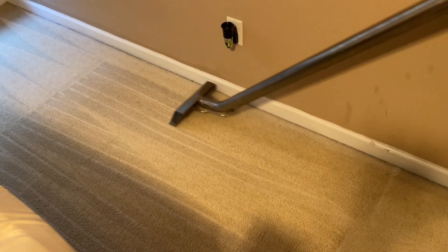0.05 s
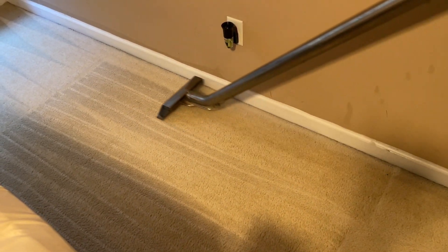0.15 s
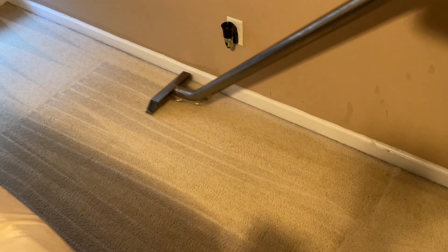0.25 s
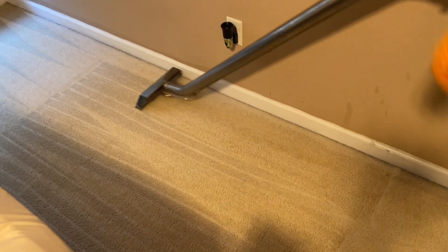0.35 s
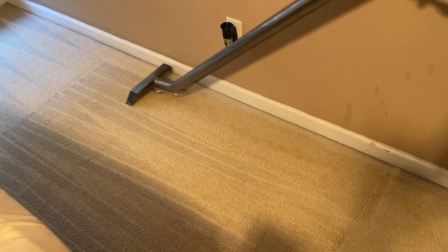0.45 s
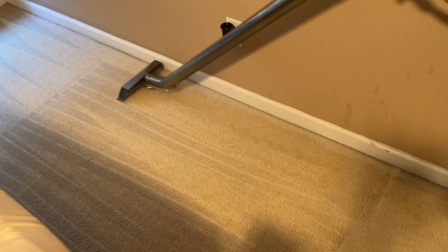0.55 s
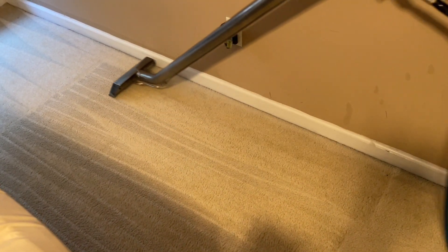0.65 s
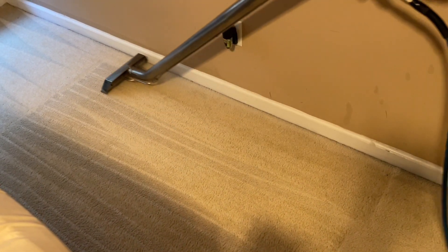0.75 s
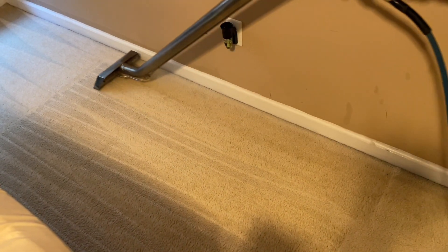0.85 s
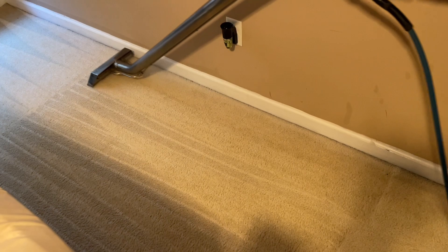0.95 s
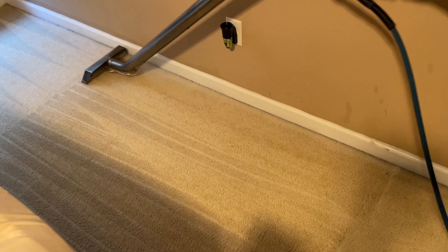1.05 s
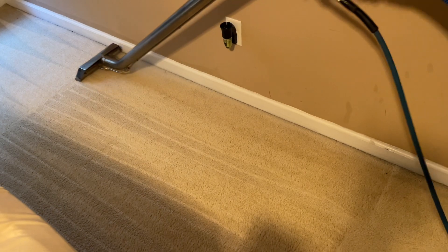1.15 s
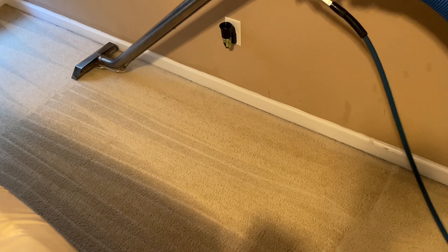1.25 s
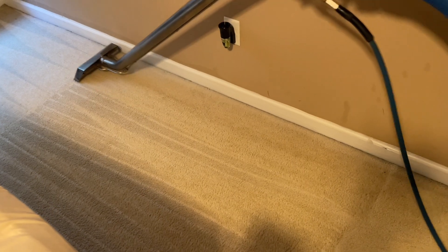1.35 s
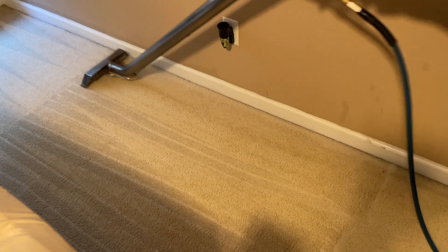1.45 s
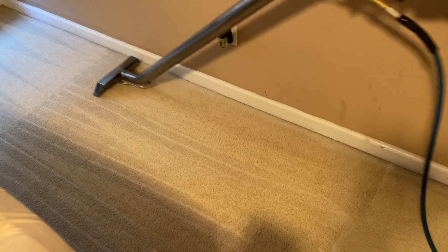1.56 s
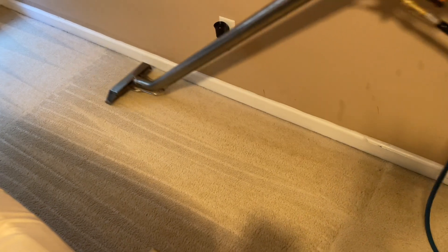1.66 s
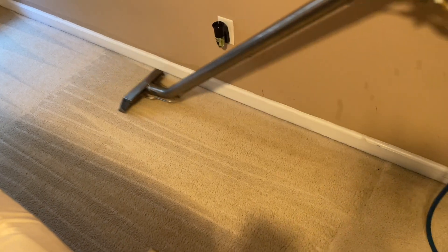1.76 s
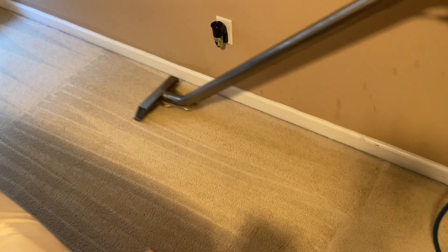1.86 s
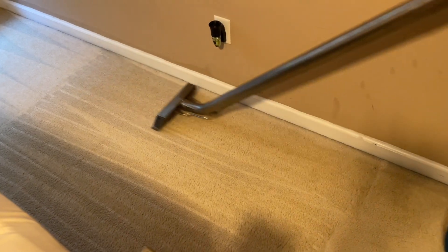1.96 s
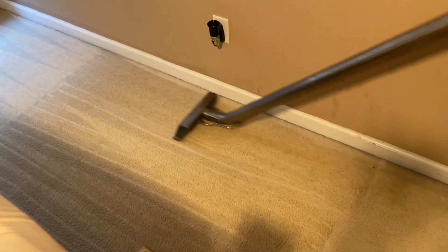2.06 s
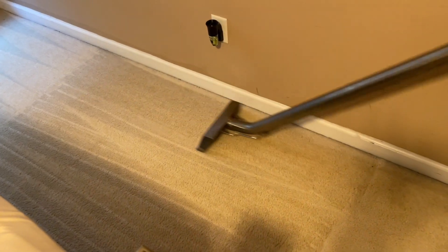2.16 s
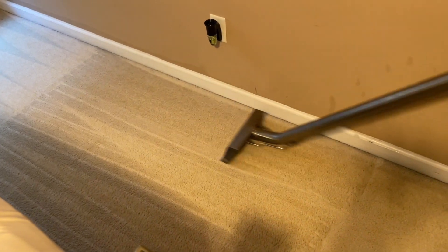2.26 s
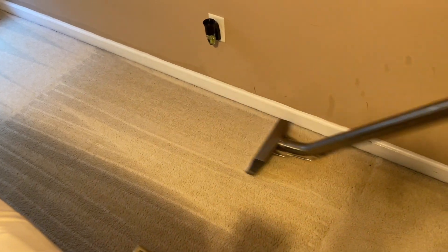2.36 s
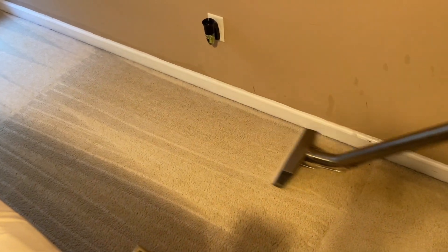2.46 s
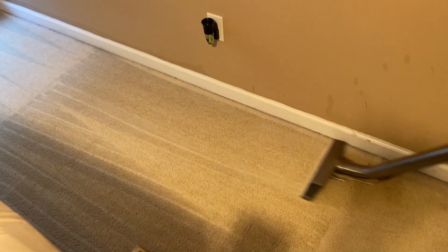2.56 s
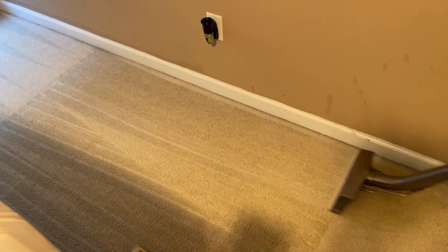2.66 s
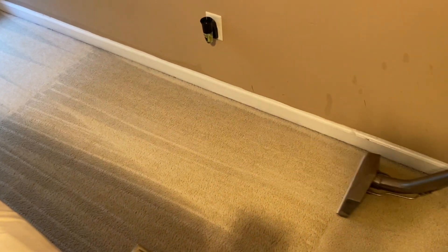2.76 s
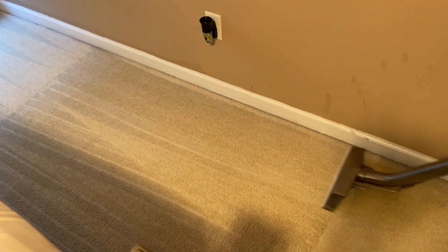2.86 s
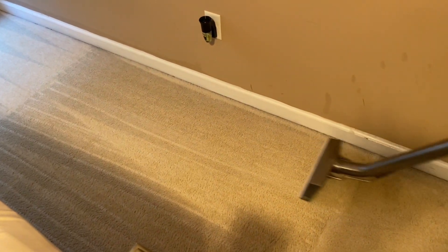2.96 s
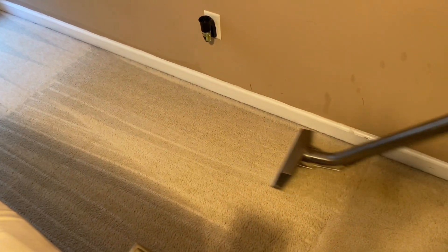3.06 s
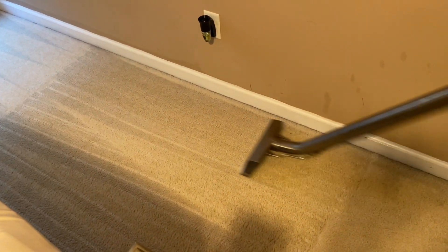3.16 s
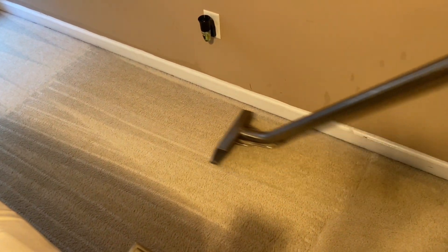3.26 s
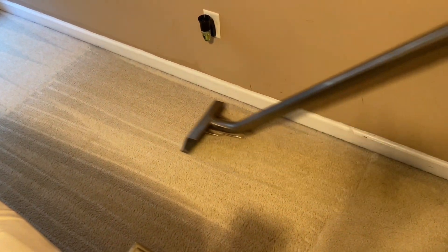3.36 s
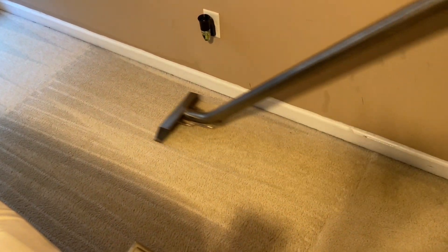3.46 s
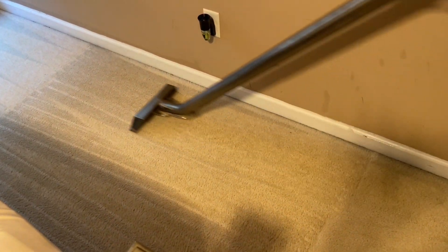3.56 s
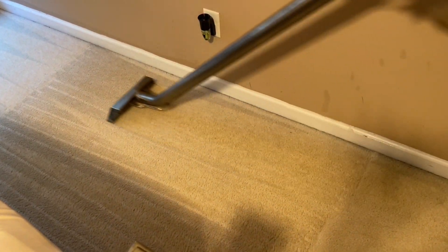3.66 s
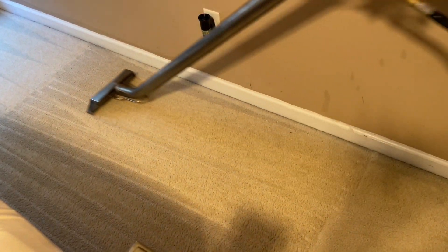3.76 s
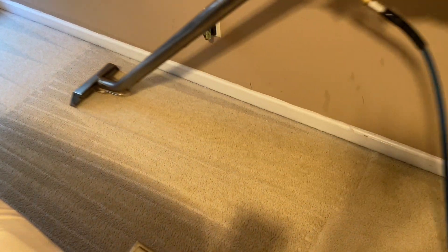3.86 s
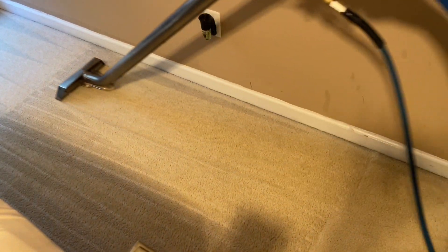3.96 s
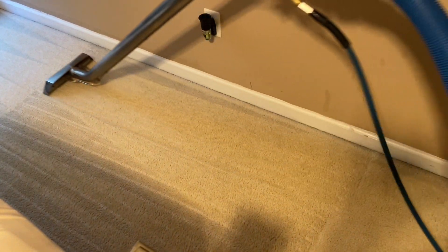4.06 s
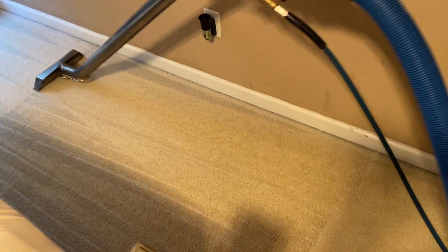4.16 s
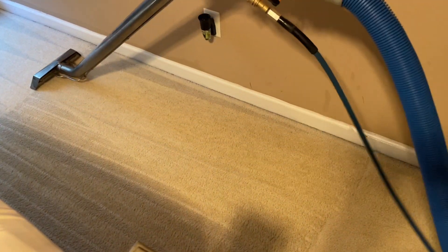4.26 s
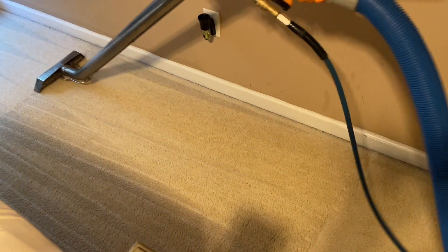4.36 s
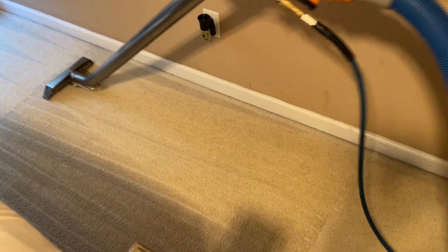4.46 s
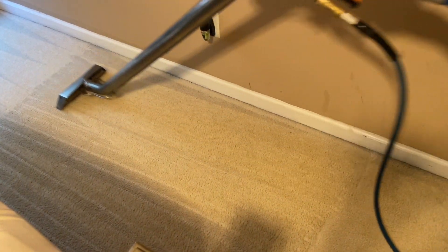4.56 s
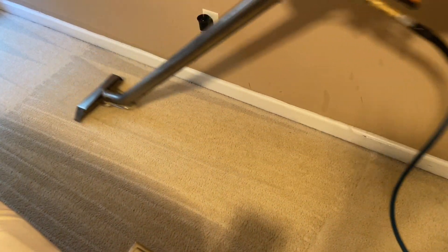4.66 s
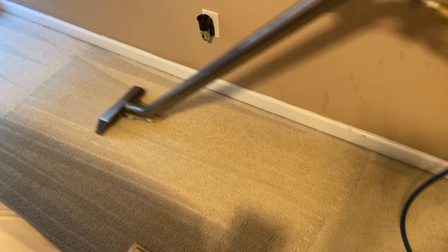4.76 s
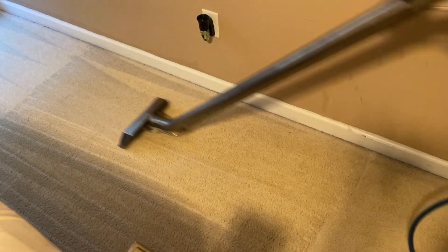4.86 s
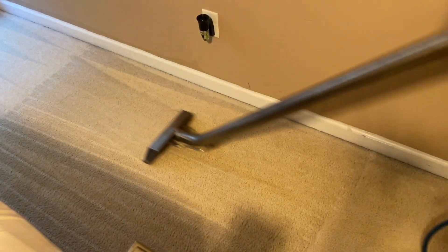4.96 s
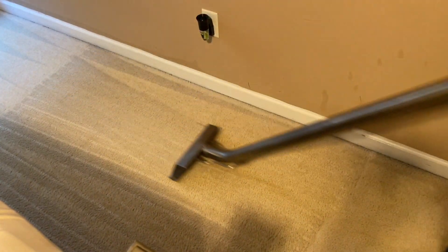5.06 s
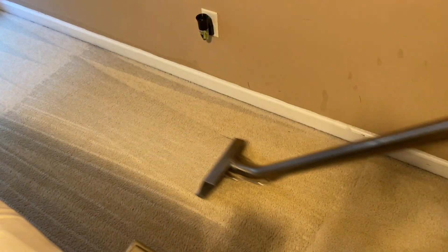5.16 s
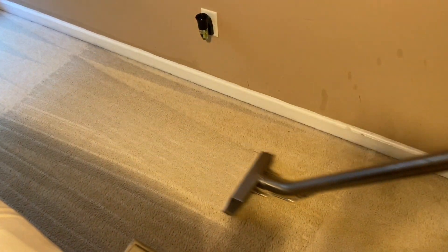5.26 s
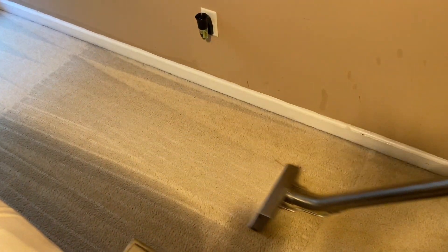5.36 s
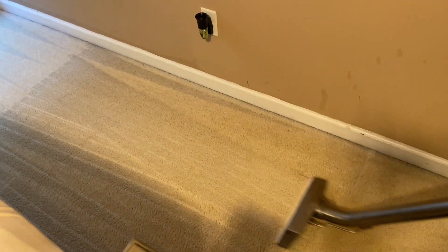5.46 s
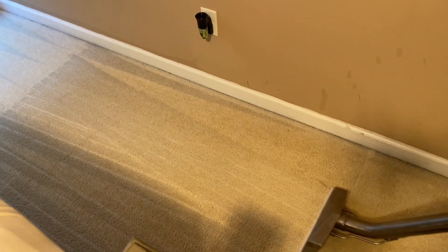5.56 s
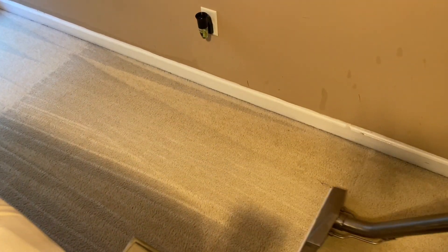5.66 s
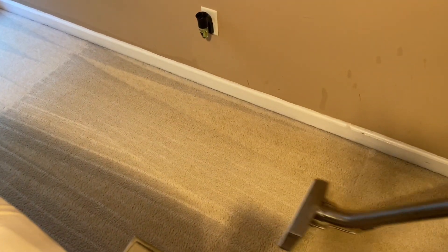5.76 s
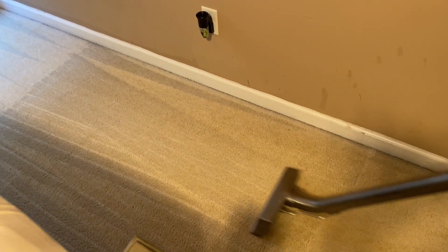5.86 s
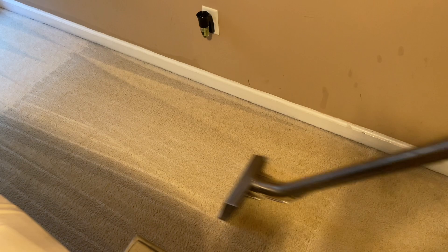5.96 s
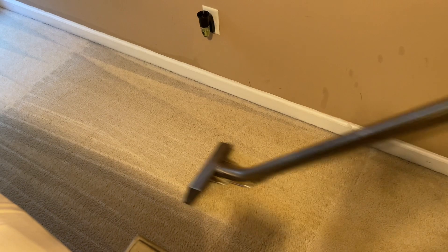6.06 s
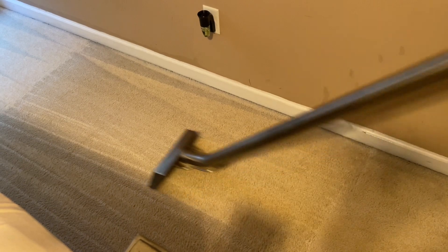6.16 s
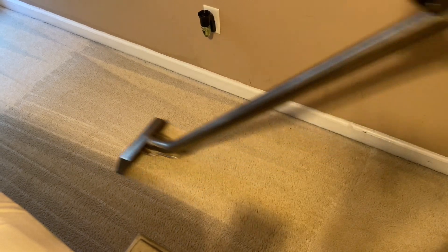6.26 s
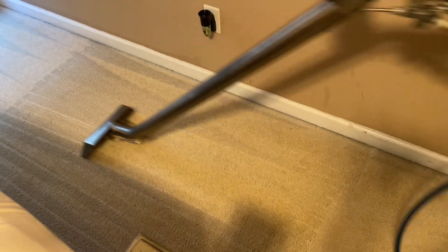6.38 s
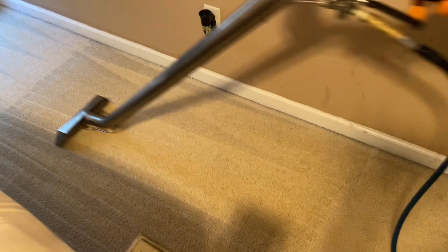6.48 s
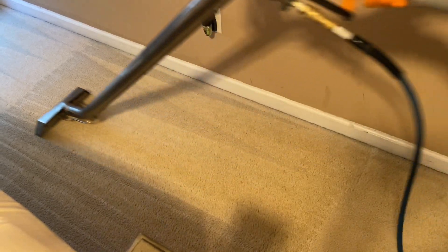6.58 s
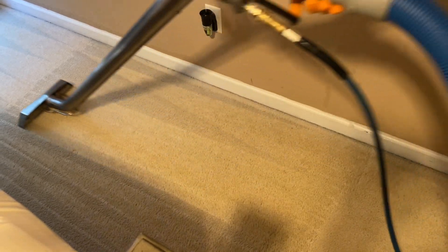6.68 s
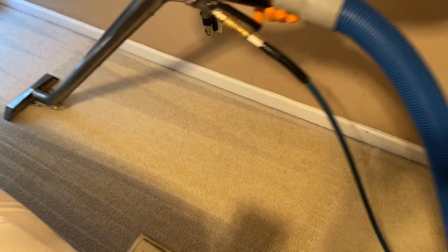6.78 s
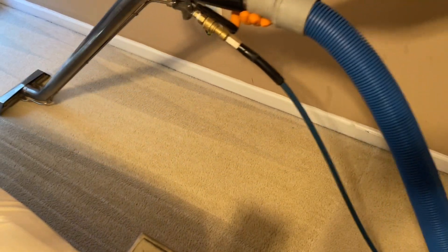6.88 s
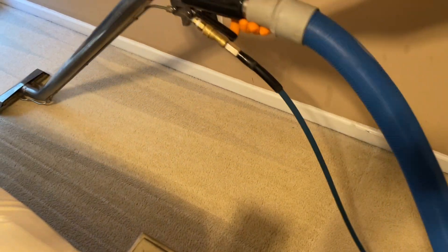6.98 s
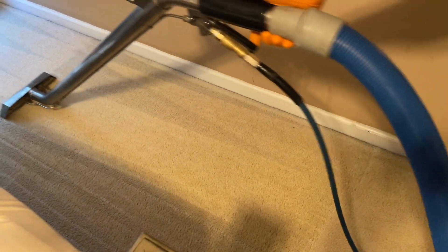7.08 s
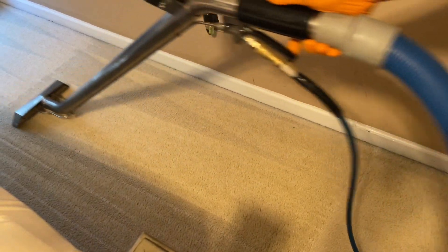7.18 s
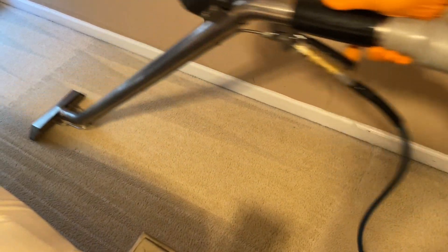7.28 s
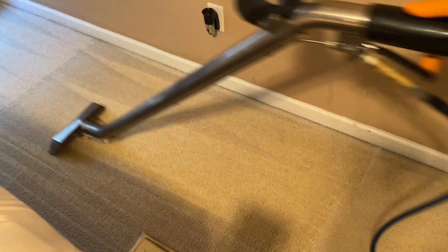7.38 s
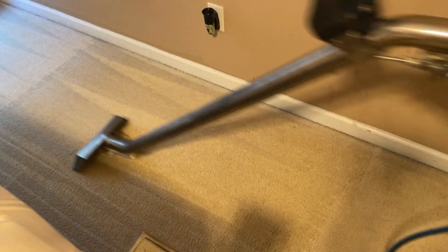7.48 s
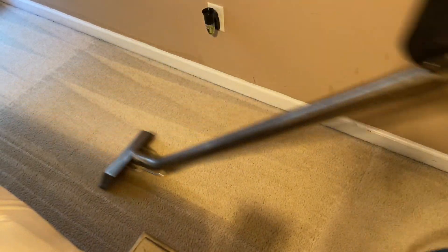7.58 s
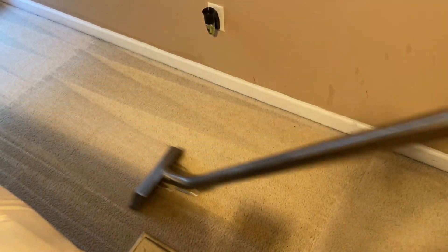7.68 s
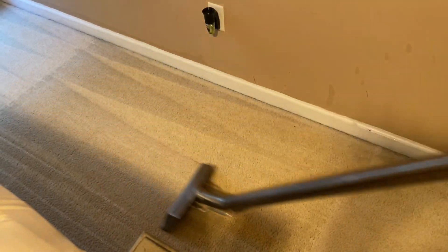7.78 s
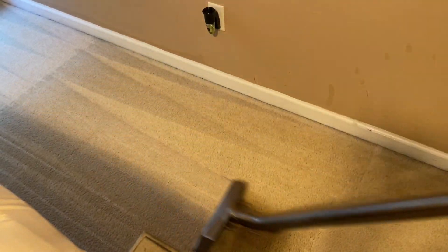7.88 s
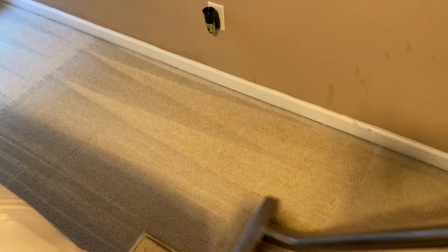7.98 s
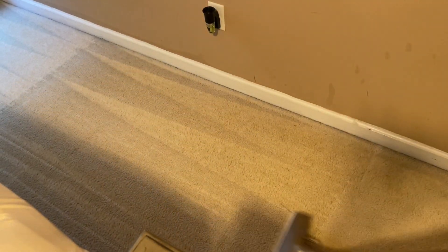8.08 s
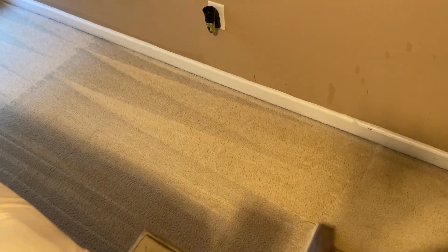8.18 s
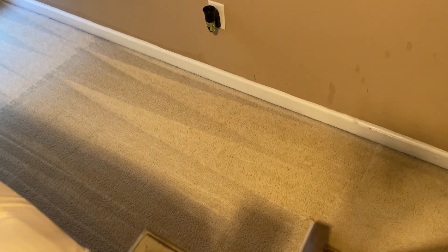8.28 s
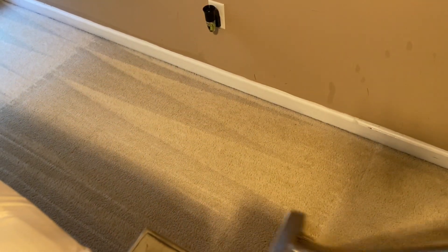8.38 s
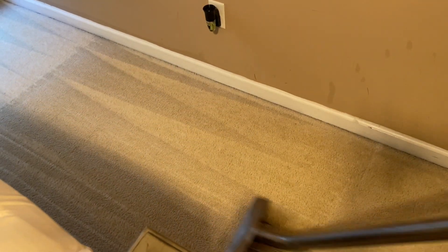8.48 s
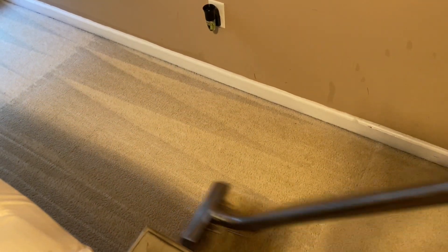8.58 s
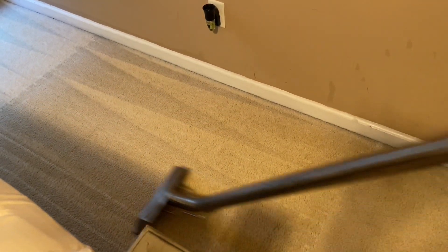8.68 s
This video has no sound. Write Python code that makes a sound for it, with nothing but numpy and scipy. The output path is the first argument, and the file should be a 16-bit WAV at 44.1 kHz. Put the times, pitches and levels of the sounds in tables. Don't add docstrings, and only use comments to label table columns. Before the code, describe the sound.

Steady airy suction and thin high hiss surround the rasping strokes of a carpet cleaning head, heard close indoors. The spray stops early with a sharp snap; the next pull is the strongest, gritty and juddering. Later strokes alternate softer and rougher, dipping briefly at each turn, with scattered dry flicks, dull floor knocks and a hose leak swelling as it swings near.

```python
import sys
import numpy as np
from scipy import signal
from scipy.fft import rfft, irfft, next_fast_len
from scipy.io import wavfile
from scipy.ndimage import uniform_filter1d, map_coordinates

SR = 44100
rng = np.random.default_rng(int(sys.argv[2]) if len(sys.argv) > 2 else 0)


def gain_from_decibels(decibels):
    exponent = np.asarray(decibels, float) / 20
    return 10 ** exponent


def persist_wave(psi):
    counts = np.round(np.clip(psi, -1, 1) * 32767).astype(np.int16)
    wavfile.write(sys.argv[1], SR, np.atleast_2d(counts).T)


N = 384993

# start_s, stop_s, drag_at_start_db, drag_at_stop_db, weight_on_floor_db
STROKES = [
    (-.3, 1.18, -35.5, -43, -60),
    (1.298, 2.745, -29, -24, -54.5),
    (2.83, 4.57, -31.5, -43, -43),
    (4.35, 5.67, -30.5, -30.5, -50),
    (5.7, 6.98, -35.5, -39.5, -39.5),
    (7.01, 8.28, -35.5, -28, -47),
    (8.33, 9.36, -35.5, -34.5, -39),
]
# time_s, leak_db
HOSE_SWING = [(0, -47.5), (1.1, -51), (1.3, -53.5), (2.2, -53.5), (2.5, -61.5), (3.3, -59), (3.6, -53.5),
              (4.1, -52.5), (4.65, -57), (4.9, -54), (5.5, -61), (6.1, -59), (6.45, -61), (6.62, -51),
              (7.1, -53), (7.7, -51), (8.1, -58.5), (8.73, -61)]
# time_s, seal_db
SLOT_SEAL = [(0, -1), (1.1, -1), (1.6, 1), (2.35, 3), (2.75, 0), (3.2, 1), (3.5, -2), (4.1, 1.5),
             (4.6, 0.5), (5.0, 0), (5.5, 3), (6.0, 0), (6.5, 2.5), (7.0, 3.5), (7.4, 3.5), (7.8, -1),
             (8.1, 4), (8.35, 0.5)]


def unit(x):
    return x / np.sqrt(np.mean(x ** 2) + 1e-20)


def along(points, hz):
    f, v = np.transpose(points)
    return np.interp(np.log(hz + 1), np.log(f + 1), v)


def curves(rows):
    s, *cols = np.transpose(rows)
    return [np.interp(np.arange(N) / SR, s, c) for c in cols]


def swells(rows):
    t = np.arange(N) / SR
    return sum(db * np.exp(-((t - s) / half) ** 2) for s, db, half in rows)


def wobble(rate):
    return map_coordinates(rng.standard_normal(N // 100), [np.arange(N) * rate / SR])


def filtered(x, response):
    m = next_fast_len(N + SR // 4)
    return irfft(rfft(x, m) * response(np.fft.rfftfreq(m, 1 / SR)), m)[..., :N]


def patches(shape, bands, frames):
    field = uniform_filter1d(rng.standard_normal(shape), size=bands, axis=0)
    return unit(uniform_filter1d(field, size=frames, axis=1))


def rush(colour, patchy_db=0, gate=1):
    pair = rng.standard_normal((2, N))
    if patchy_db:
        z = signal.stft(pair, nperseg=512)[2]
        gain = gain_from_decibels(patchy_db * patches(z.shape[1:], bands=6, frames=10))
        pair = signal.istft(z * gain, nperseg=512)[1][:, :N]
    return unit(filtered(gate * pair, lambda hz: gain_from_decibels(along(colour, hz))))


def reach():
    # time_s, distance_m
    distance = [(0, 1.8), (1.2, 2.06), (1.6, 2), (2.8, 1.13), (4.25, 2.44), (4.6, 1.9), (5.7, 1.54),
                (7.0, 2.9), (7.3, 1.8), (8.25, 0.71), (8.73, 1.85)]
    return curves(distance)[0] - 1.8


def jet(fall_s=0.0089):
    valve_s = 1.163
    return np.exp(-np.maximum(np.arange(N) / SR - valve_s, 0) / fall_s)


def moving(attack_s, release_s):
    t = np.arange(N) / SR
    start, stop = np.transpose(STROKES)[:2, :, None]
    rise = 1 - np.exp(-np.maximum(t - start, 0) / attack_s)
    fall = 1 - np.exp(-np.maximum(stop - t, 0) / release_s)
    return (rise * fall) ** 1.3


def stroke_gain(levels_db, pull_db, rest_db, attack_s, release_s):
    pulls = np.arange(len(STROKES))[:, None] % 2
    moves = gain_from_decibels(levels_db + pull_db * pulls) * moving(attack_s, release_s)
    return np.hypot(moves.sum(axis=0), gain_from_decibels(rest_db))


def jerks():
    breaks = [
        1.316,
        4.364,
        7.026,
        8.352,
    ]
    hushes = [0, -5.5, -4.5, 2]
    t = np.arange(N) / SR
    hush_s = 0.1
    hush_db = sum(db * (t < s) * np.exp(np.minimum(t - s, 0) / hush_s) for s, db in zip(breaks, hushes))
    return gain_from_decibels(hush_db)


def boom(weight_db, tread_db, judder):
    # pitch_hz, level_db (per Hz)
    boom_colour = [(20, -46), (32, -13), (45, 1), (65, 11.5), (80, 7), (95, 3.5), (130, -52)]
    gain = stroke_gain(weight_db - 4 * reach(), pull_db=3.0, rest_db=-53.5, attack_s=0.05, release_s=0.043)
    return gain * gain_from_decibels(tread_db + 0.32 * judder) * rush(boom_colour)


def thrum(level_db, judder, flutter):
    # pitch_hz, level_db (per Hz)
    thrum_colour = [(60, -39), (85, 2), (100, 2), (135, 4.5), (160, -7.5), (220, -39.5)]
    # time_s, extra_db, half_length_s
    heaves = [(.82, -3.5, .1), (1.25, 5, .07), (1.55, -1, .1), (1.87, -2, .07), (2.32, -3.5, 0.08),
              (3.62, 5, .06), (2.92, -5, 0.078), (3.2, -3, .12), (3.95, -3, .07), (4.5, 0, 0.064),
              (4.85, -7, 0.11), (2.6, 1.5, 0.13), (5.3, 1, .08), (5.77, -4, .07), (6.05, -1, .07),
              (6.52, 2.5, .08), (6.85, 3.5, .12), (7.45, 3, .12), (8.6, 2, .1)]
    gain = stroke_gain(level_db + swells(heaves), pull_db=-0.5, rest_db=-50.0, attack_s=0.069, release_s=0.12)
    return gain * gain_from_decibels(0.5 * judder) * rush(thrum_colour, gate=gain_from_decibels(flutter))


def roar(level_db, judder, flutter):
    # pitch_hz, level_db (per Hz)
    roar_colour = [(120, -19), (160, -6.5), (200, 0), (320, -2), (480, -6), (620, -14), (900, -27.5),
                   (2000, -51)]
    gain = stroke_gain(level_db, pull_db=0, rest_db=-43.5, attack_s=0.048, release_s=0.055)
    return gain * gain_from_decibels(0.36 * judder) * rush(roar_colour, gate=gain_from_decibels(0.84 * flutter))


def fibre_snaps():
    # pitch_hz, level_db (per Hz)
    fibre_colour = [(500, -16), (900, -12), (1400, 6), (2600, -5), (4500, -17), (9000, -28)]
    rate = 700
    size = gain_from_decibels(6.5 * np.minimum(rng.exponential(size=N), 2))
    clicks = (rng.random((2, N)) < rate / SR) * size * np.sign(rng.standard_normal(N))
    return unit(filtered(clicks, lambda hz: gain_from_decibels(along(fibre_colour, hz))))


def rasp(level_db, done, judder, flutter):
    # pitch_hz, level_db (per Hz)
    rasp_colour = [(400, -3.5), (650, -0.5), (850, 1), (1200, -2), (1600, -2.5), (2200, -17.5),
                   (3000, -18.5), (6000, -28)]
    # at_start_db, at_stop_db
    lip_bite = [(5, 9.5), (-1, -3), (-0.3, 1.5), (-1, 1), (3.5, -2), (1, 0.5), (-3.5, 5)]
    # time_s, extra_db, half_length_s
    scrapes = [(.5, -1.5, 0.16), (1.2, -3, 0.072), (2.93, -0.5, .07), (8.05, 1, .1), (1.35, 9, 0.097),
               (1.6, -2.5, 0.16), (2.25, 1, .2), (3.35, 2.5, 0.077), (3.6, -3, 0.083), (3.0, 1, .15),
               (3.95, -2, 0.12), (4.2, 3.5, .08), (5.25, -1.5, 0.15), (5.67, -3, .04), (5.78, 2, .05),
               (5.9, -0.5, .1), (2.82, -3, .03), (4.9, 1.5, .1), (4.6, 1.5, .1), (6.3, 3.5, 0.27),
               (6.75, 6, 0.067), (7.12, 2, 0.05), (7.6, -1, 0.15), (8.2, -4, 0.061), (8.45, 1.5, .08)]
    first_db, last_db = np.transpose(lip_bite)[:, :, None]
    wet_db = 4 * jet(fall_s=0.19)
    bite_db = first_db + (last_db - first_db) * done + wet_db + swells(scrapes)
    gain = stroke_gain(level_db + bite_db, pull_db=3.5, rest_db=-47.5, attack_s=0.05, release_s=0.03)
    scratch = rush(rasp_colour, patchy_db=-0.1, gate=gain_from_decibels(0.22 * flutter + 0.96 * wobble(300)))
    return gain * gain_from_decibels(0.81 * judder + 0.61) * (scratch + gain_from_decibels(-10) * fibre_snaps())


def drag(judder):
    # time_s, extra_db, half_length_s
    snags = [(.12, 5, 0.075), (.42, 6, 0.023), (1.2, 8, 0.082), (1.25, 10, 0.042), (1.29, -3, .03),
             (1.4, -10, 0.073), (1.5, 0, .06), (1.66, 2, 0.2), (1.82, -2, 0.11), (2.0, 3, 0.059),
             (2.41, 2.5, 0.023), (2.745, 6, 0.029), (2.78, 3, .02), (2.85, 7, .015), (2.925, -4, .012),
             (3.14, 1, 0.083), (3.38, 0.5, .08), (3.57, -5, 0.073), (3.8, 2, 0.073), (4.48, 0, 0.091),
             (4.62, 0.5, 0.036), (4.73, 5.5, 0.04), (4.97, 2, 0.044), (5.48, 1, .06), (5.62, -8, 0.039),
             (5.79, -7, 0.056), (6.3, 3, 0.26), (6.63, -3.5, 0.077), (6.73, 1, 0.046), (7.27, 1, 0.032),
             (7.45, 1, 0.034), (8.11, -0.5, 0.062), (8.23, -8, 0.042), (8.4, -8, 0.06), (8.66, 2.5, .06)]
    # time_s, lift_db, half_length_s
    tread = [(.02, 7, .08), (1.12, 11, 0.059), (1.9, 4, .06), (2.6, 6, .12), (3.14, 7, 0.085),
             (3.97, 6, 0.099), (4.15, 6, 0.087), (4.45, 4, 0.11), (2.64, 6, .15), (1.36, -9, .05),
             (2.6, 7, .07), (7.47, -9, .06), (4.85, -9, .1), (2.8, 7, .06), (3, 0, .1), (1.67, -9, 0.087),
             (.85, -7, .12), (3.1, 2, .08), (5.4, 4, .12), (6.55, -3, 0.062), (7.65, 3, .07),
             (5.03, -10, 0.058), (5.49, 7, .06), (5.97, 7.5, 0.24), (7.39, 3, .05), (7.93, -1, .1),
             (8.38, 9, 0.051), (8.51, 7, .06), (8.73, 9, 0.05)]
    start, stop, first_db, last_db, weight_db = np.transpose(STROKES)[:, :, None]
    done = np.clip((np.arange(N) / SR - start) / (stop - start), 0, 1)
    drag_db = first_db + (last_db - first_db) * done
    snag_db, tread_db = swells(snags), swells(tread)
    thrum_db = drag_db - 4.5 + 2.0 * snag_db + 0.19 * (weight_db + 45.0) + 0.17 * tread_db
    flutter = wobble(90)
    low = boom(weight_db, tread_db, judder) + thrum(thrum_db, judder, flutter)
    scrape = roar(drag_db + snag_db, judder, flutter)
    scrape = scrape + rasp(drag_db - 7 + 0.58 * snag_db, done, judder, flutter)
    return low + jerks() * scrape


def air(judder):
    # time_s, flow_db
    flow = [(0, -39.5), (.5, -42), (1.15, -41.5), (1.36, -34), (1.53, -41), (2.1, -38.5), (2.5, -40),
            (2.9, -46.5), (3.5, -45.5), (4.2, -52), (4.67, -48), (5.0, -44.5), (5.57, -43.5), (6.1, -47.5),
            (6.7, -53), (7.3, -49.5), (8.17, -44), (8.73, -49.5)]
    # time_s, extra_flow_db, half_length_s
    gulps = [(1.19, 0.5, 0.02), (1.24, 3, 0.01), (1.28, -1, .03), (2.74, 6, 0.088), (3.45, -1, 0.19),
             (4.56, 5, .03), (4.72, 2, 0.052), (4.44, -1, .05), (4.95, 0, 0.046), (5.7, 2, 0.029),
             (6.12, 2.5, .04), (6.23, -1.5, 0.035), (6.47, 1.5, .05), (7.06, 4.5, 0.06),
             (7.32, -1.5, 0.067), (8.35, 4, 0.018)]
    # pitch_hz, level_db (per Hz)
    suck_colour = [(900, -8), (1900, 0), (2200, -0.5), (2800, -2), (3600, -2), (4300, -5.5), (6000, -30)]
    whistle_colour = [(2500, -15), (3600, -7), (4300, -3.5), (5100, -3), (5800, -3.5), (6600, -8.5),
                      (8500, -25)]
    spray_colour = [(4500, -13.5), (6000, -1), (7200, 1), (8500, -1), (9800, -3), (10800, -8), (13000, -35)]
    mist_colour = [(8000, -13), (10000, -3), (11000, -1.5), (12500, -5), (14000, -5.5), (15000, -6),
                   (16500, -18)]
    leak_colour = [(12500, -27), (14000, -6), (14800, 6), (15500, 6), (16500, 2)]

    flow_db = curves(flow)[0] + 45 + swells(gulps)
    hose_db, seal_db = curves(HOSE_SWING)[0], curves(SLOT_SEAL)[0]
    rest = 1 - moving(attack_s=0.12, release_s=0.06).sum(axis=0)
    wet, far = jet(), reach()
    suck_db = -45 + 1.12 * flow_db - 4 * rest + 5 * wet + 0.78 * far
    whistle_db = -46 + 0.51 * flow_db - 4 * rest + 6 * wet - 1.4 * far + seal_db
    spray_db = -49.5 + 0.62 * flow_db - 3 * rest + 7 * wet - 0.47 * far + 0.18 * seal_db
    mist_db = -53.5 + 0.77 * (hose_db + 58.5) + 0.24 * flow_db + 3 * wet

    sputter = wobble(150)
    suck = rush(suck_colour, patchy_db=1.44, gate=gain_from_decibels(0.57 * sputter))
    suck = jerks() * gain_from_decibels(suck_db + 0.37 * judder + 3.0) * suck
    whistle = rush(whistle_colour, patchy_db=1.06, gate=gain_from_decibels(0.12 * sputter))
    whistle = gain_from_decibels(whistle_db + 0.24 * judder + 2.5) * whistle
    spray = rush(spray_colour, patchy_db=0.6, gate=gain_from_decibels(0.29 * sputter))
    spray = gain_from_decibels(spray_db + 0.19 * judder + 9) * spray
    mist = gain_from_decibels(mist_db + 0.2 * judder + 5.5) * rush(mist_colour)
    leak = gain_from_decibels(hose_db + 0.4 * wobble(8) + 9.0) * rush(leak_colour)
    return suck + whistle + spray + mist + leak


def walls(pair, depth_db):
    # time_s, low_hz, high_hz, low_lift_db, high_lift_db
    cavity = [(0.0, 1030, 2740, 5, 3), (0.53, 1150, 2540, 5, 4), (1.75, 1050, 2430, 3.5, 2),
              (2.09, 1120, 2970, 5, 3.5), (2.63, 1160, 2470, 3, -1), (3.28, 1180, 3150, 5.5, 5.5),
              (3.38, 1000, 2640, 3.5, 7.5), (3.57, 1150, 2680, 4, 7), (4.2, 900, 2730, 2, 5),
              (4.55, 1160, 2500, 4.5, 6), (4.63, 1160, 2250, 6, 4), (4.73, 1170, 2980, 8.5, 8.5),
              (4.83, 1130, 2300, 6, 2.5), (4.95, 1090, 2600, 7.5, 4.5), (5.33, 940, 2150, 7.5, 2),
              (5.7, 794, 1900, -5, 0), (5.91, 910, 2641, 2.5, 1), (6.73, 970, 2740, 3, 0.5),
              (7.29, 920, 2440, 7, 4.5), (7.66, 1210, 2550, 6, 1), (8.73, 1010, 2620, 0, 2)]
    # time_s, notch_hz, depth_db, third_multiple_db, low_lift_db
    mirror = [(0, 634, -2, -5.5, 4.5), (.5, 617, -6.5, -5, -1.5), (1.25, 626, 0, -1, -0.5),
              (1.7, 636, 1, -1.5, -4), (2.1, 654, 0.5, -6, -0.5), (2.45, 650, -1, -2, -3.5),
              (2.9, 630, 2, 1.5, 0), (3.45, 660, -1, -3, 4), (3.8, 650, -2, -5, 1.5),
              (4.2, 624, -4.5, -7, -1.5), (4.6, 615, -7.5, -7, 1), (5.0, 640, -1, -6, -0.5),
              (5.5, 606, 1.5, 0.5, -1.5), (6.2, 700, -5.5, -3, -4.5), (6.8, 644, -4.5, -3, -1),
              (7.55, 630, -0.5, -4.5, -2.5), (8.1, 630, 1, -6, 0), (8.5, 626, -1, -4, -4)]
    # time_s, lift_db, half_length_s
    grip = [(.65, -3, .1), (1.27, -1, .07), (2.3, 1, 0.17), (2.93, 0, .07), (3.5, 2.5, 0.086),
            (4.65, -3.5, 0.12), (5.7, -1, .12), (6.6, 1.5, 0.26), (7.42, -6, 0.056), (7.72, 4, 0.087),
            (8.32, -11, 0.095), (8.63, -5.5, 0.091)]

    hz, t, z = signal.stft(pair, SR, nperseg=2048)
    at = np.minimum(t * SR, N - 1).astype(int)
    far, wet = reach()[at], jet()[at]
    hose_db, seal_db = curves(HOSE_SWING)[0][at], curves(SLOT_SEAL)[0][at]

    def hump(centre_hz, width_hz):
        return 1 / (1 + ((hz[:, None] - centre_hz) / width_hz) ** 2)

    gain_db = along(depth_db, hz)[:, None] * patches(z.shape[1:], bands=3, frames=22)
    low_hz, high_hz, low_db, high_db = (c[at] for c in curves(cavity))
    gain_db = gain_db + low_db * hump(low_hz, 197) + high_db * hump(high_hz, 470)
    slot_db = 1.25 * (0.74 - 2.5 * far)
    gain_db = gain_db + slot_db * hump(4840, 320) + 0.46 * seal_db * hump(5130, 280)
    floor_db = -3 * far + 2 * wet
    gain_db = gain_db + floor_db * hump(503, 105)
    shadow_db = 1.4 - 4 * far + 2.5 * wet - 0.36 * (hose_db + 58)
    gain_db = gain_db + 0.87 * shadow_db * hump(7640, 480)
    notch_hz, notch_db, third_db, room_db = (c[at] for c in curves(mirror))
    gain_db = gain_db + notch_db * hump(notch_hz, 76) + third_db * hump(3 * notch_hz, 100)
    gain_db = gain_db + room_db * hump(323, 75) + swells(grip)[at] * hump(233, 44)
    return signal.istft(z * gain_from_decibels(gain_db), SR, nperseg=2048)[1][:, :N]


def valve_snaps():
    # time_s, peak_db, centre_hz, fade_by_60_db_s
    snaps = [
        (1.222, -26, 6200, 0.045),
        (1.159, -13, 9300, 0.015),
        (1.223, -25.5, 8500, 0.06),
        (1.4, -34, 2440, 0.018),
        (5.6, -31, 8100, .03),
    ]
    out, t = np.zeros((2, N + SR)), np.arange(SR // 4) / SR
    for s, db, hz, t60 in snaps:
        spread = uniform_filter1d(rng.standard_normal((2, len(t))), size=16, axis=1)
        burst = unit(spread) * np.sin(2 * np.pi * hz * t) + 0.28 * rng.standard_normal((2, len(t)))
        burst[1] *= 0.3
        fade = gain_from_decibels(db + 4 - 60 * t / t60) * (1 - np.exp(-t / 0.0015))
        out[:, round(s * SR):][:, :len(t)] += fade * burst
    return out[:, :N]


def flicks():
    # time_s, peak_db
    tuft_flicks = [(1.296, -21.5), (1.314, -19.5), (1.508, -25), (1.686, -24), (1.848, -20), (2.005, -21),
                   (2.127, -22), (2.2, -19), (2.305, -21), (2.411, -18), (2.606, -24), (2.652, -23),
                   (2.771, -25), (2.945, -28), (3.052, -27), (3.22, -33), (3.243, -28), (3.407, -30),
                   (3.847, -32), (4.096, -27), (4.371, -27), (4.455, -29), (4.56, -17.5), (4.585, -17),
                   (4.638, -29), (4.656, -19.5), (4.708, -17), (4.788, -28), (4.894, -20), (5.005, -18.5),
                   (5.076, -22), (5.132, -28), (5.187, -19.5), (5.409, -28), (5.665, -30), (5.83, -26),
                   (5.856, -31), (5.882, -25), (5.945, -28), (6.033, -23), (6.124, -34), (6.297, -26),
                   (6.384, -28), (6.439, -24.5), (6.691, -38), (6.799, -30), (6.896, -32), (7.027, -31),
                   (7.07, -29), (7.106, -29), (7.199, -40), (7.257, -28), (7.318, -21), (7.483, -25.5),
                   (7.529, -22.5), (7.568, -30), (7.586, -28), (7.712, -27), (7.952, -20), (8.006, -24)]
    # pitch_hz, level_db (per Hz)
    tuft_colour = [(300, -5), (900, 4), (1500, 2), (2500, -9), (3500, -10.5), (6000, -24), (10000, -32)]
    t60 = 0.027
    out, t = np.zeros((2, N + SR)), np.arange(SR // 20) / SR
    for s, db in tuft_flicks:
        fade = gain_from_decibels(db - 6.5 - 60 * t / t60) * (1 - np.exp(-t / 0.0013))
        out[:, round(s * SR):][:, :len(t)] += fade * rng.standard_normal((2, len(t)))
    return filtered(out[:, :N] * [[1], [0.6]], lambda hz: gain_from_decibels(along(tuft_colour, hz) + 13))


def thumps():
    # time_s, peak_db, pitch_hz, fade_by_60_db_s
    floor_thumps = [(3.99, -23, 60, 0.11), (4.065, -28, 82, 0.086), (4.40, -23, 75, .06),
                    (8.38, -25, 70.4, 0.17), (8.459, -23, 70, .1), (4.281, -16.5, 74, 0.07),
                    (5.929, -18.5, 91, 0.083), (8.497, -29, 75.5, 0.16), (8.578, -23, 77, .1)]
    out, t = np.zeros((2, N + SR)), np.arange(SR // 4) / SR
    for s, db, hz, t60 in floor_thumps:
        fade = gain_from_decibels(db + 6.0 - 60 * t / t60) * (1 - np.exp(-t / 0.0088))
        out[0, round(s * SR):][:len(t)] += fade * np.sin(2 * np.pi * hz * t)
    return out[:, :N]


def standing(hz):
    # pitch_hz, width_hz, lift_db
    standing_waves = [(74, 58, 1.5), (134, 46, 3), (191, 18.5, 6), (228, 5, 2), (301, 16, 5),
                      (384, 14, -0.5), (444, 39, 3), (569, 23, 3.5), (815, 13, 3.5), (1050, 32, -1.5),
                      (2140, 330, 0.5), (5100, 380, 0.5)]
    return gain_from_decibels(sum(db / (1 + ((hz - c) / (w / 2)) ** 2) for c, w, db in standing_waves))


def ports(pair):
    # pitch_hz, likeness (0-1)
    alike = [(40, 0.93), (80, 0.95), (160, 1), (290, 0.92), (640, 0.38), (1050, 0.58), (1400, 0.45),
             (2200, 0.73), (3200, 0.42), (4800, 0.67), (5700, 0.37), (7000, 0.88), (7800, 0.84),
             (9500, 0.81), (12000, 0.96), (13500, .5), (13950, .998), (15050, .998), (15300, 0.69)]
    # pitch_hz, level_db
    lean = [(60, 0.5), (200, -2), (380, -2), (700, 2.5), (1400, 3.5), (1900, 2), (2400, 2), (6000, 2.5),
            (7000, -0.5), (16000, 0)]
    # pitch_hz, angle_radians
    right_lead = [(200, 0), (480, -0.57), (800, -0.1), (1350, 0.38), (1700, .5), (2250, 0.1), (2600, -0.5),
                  (3200, -1.1), (4400, -0.1), (5300, 0), (6000, 1.86), (6900, 3), (8100, 2.5), (10000, 3)]
    m = next_fast_len(N + SR // 4)
    hz = np.fft.rfftfreq(m, 1 / SR)
    turn = np.arccos(np.clip(along(alike, hz), 0, 1)) / 2
    same, other = rfft(pair, m) * standing(hz) * [np.cos(turn), np.sin(turn)]
    delay_s, bend_hz = 1.38e-4, 6900
    lead = along(right_lead, hz) + 2 * np.pi * delay_s * np.maximum(hz - bend_hz, 0)
    skew = gain_from_decibels(along(lean, hz) / 2) * np.exp(-1j * lead / 2)
    return irfft(np.array([(same + other) * skew, (same - other) / skew]), m)[:, :N]


def scene():
    judder = unit(wobble(11.0) + 0.95 * wobble(22) + 6.4 * wobble(45))
    judder = unit(np.tanh(judder / 1.9))
    echo_depth_db = [(60, .8), (200, 1.46), (700, 2.35), (3000, 1.75), (10000, 1.0)]  # (Hz, dB)
    wand = walls(gain_from_decibels(-2.5) * (drag(judder) + air(judder)), echo_depth_db)
    pan_db = reach() + 0.5 * jet(fall_s=0.43)
    return ports(wand + valve_snaps() + flicks() + thumps()) * gain_from_decibels([pan_db / 2, -pan_db / 2])


def roll_off(x):
    return signal.sosfilt(signal.butter(12, 16120, fs=SR, output="sos"), x)


def record(dry):
    top_hz, bass_cut_hz = 15720, 37.4

    def band(hz):
        return (hz < top_hz) * (hz / (hz - 1j * bass_cut_hz)) ** 2

    return roll_off(filtered(dry, band))


dry = scene()
out = record(dry)
persist_wave(out)
```